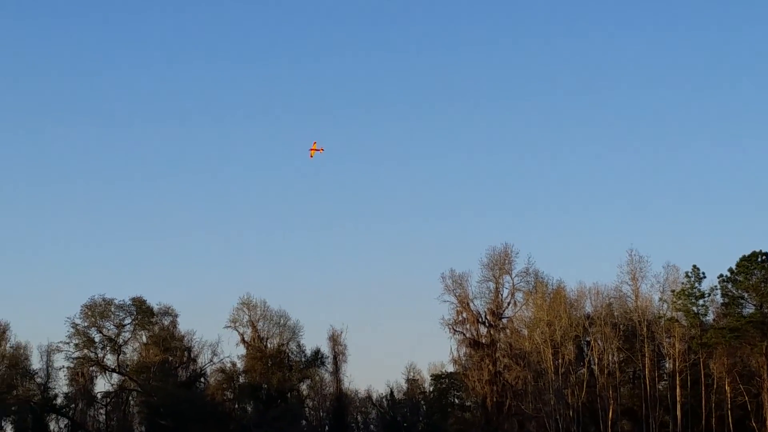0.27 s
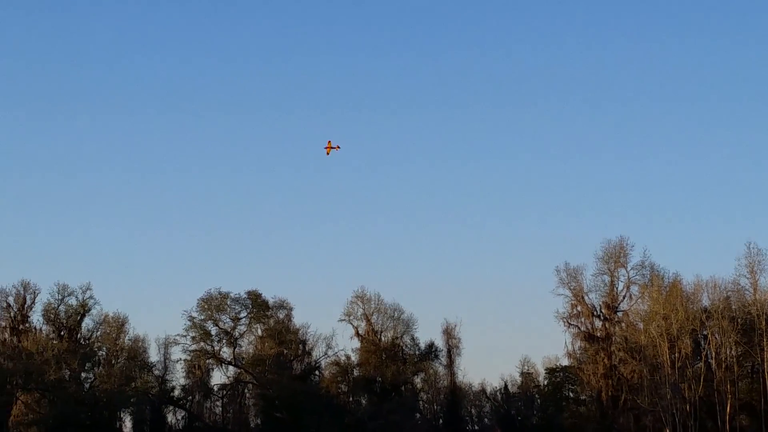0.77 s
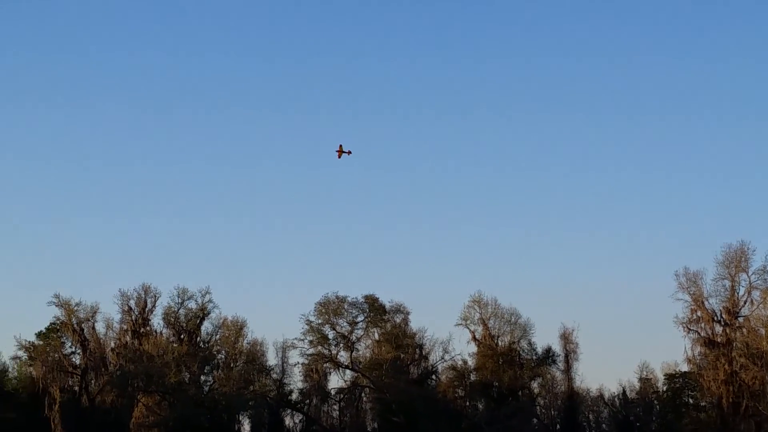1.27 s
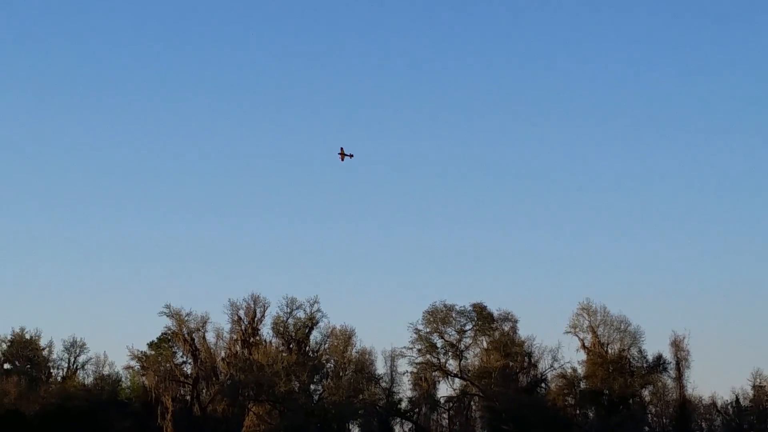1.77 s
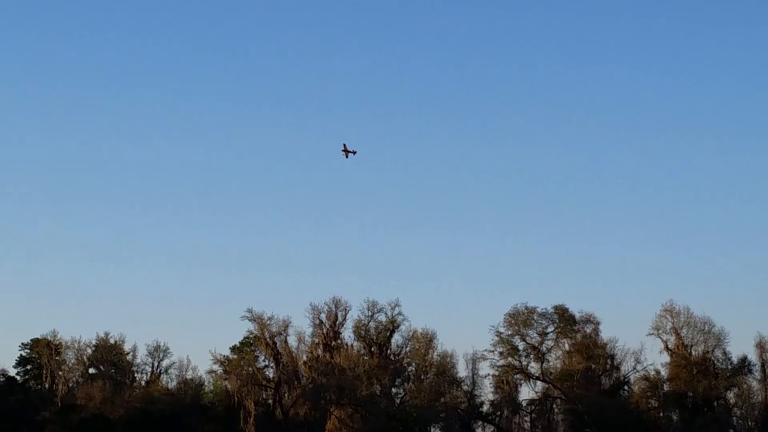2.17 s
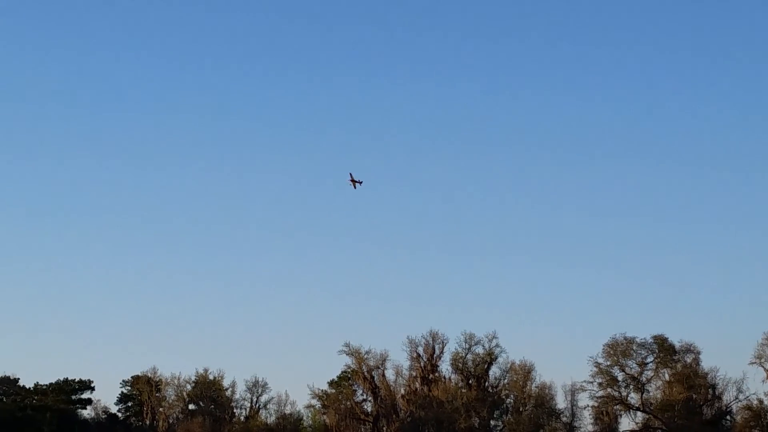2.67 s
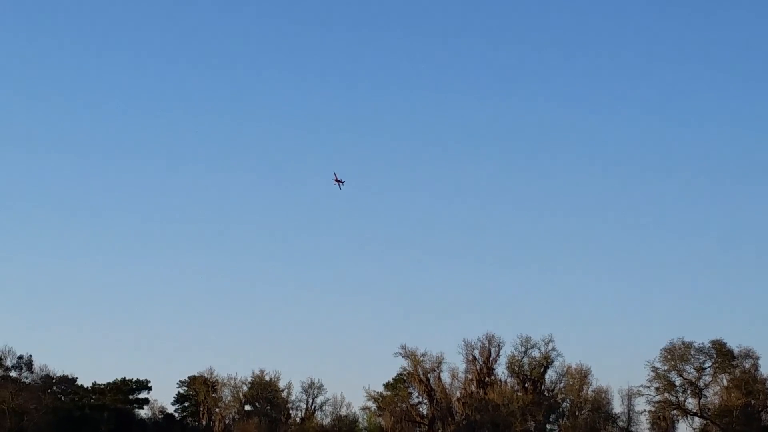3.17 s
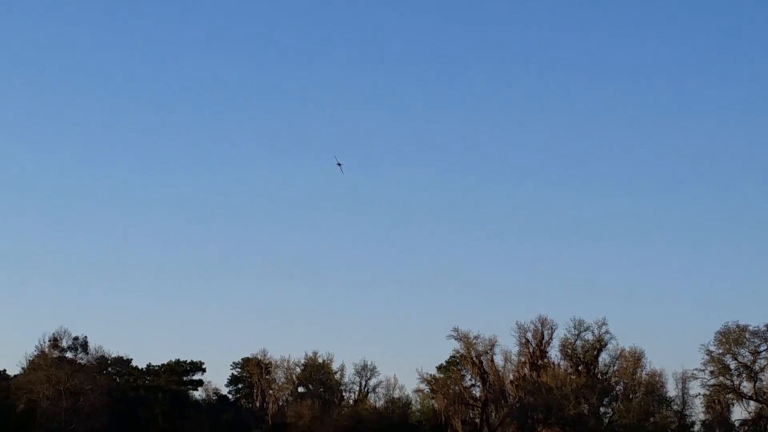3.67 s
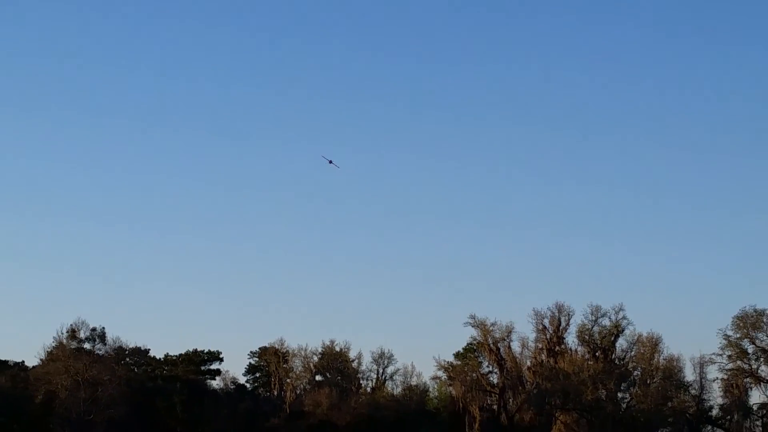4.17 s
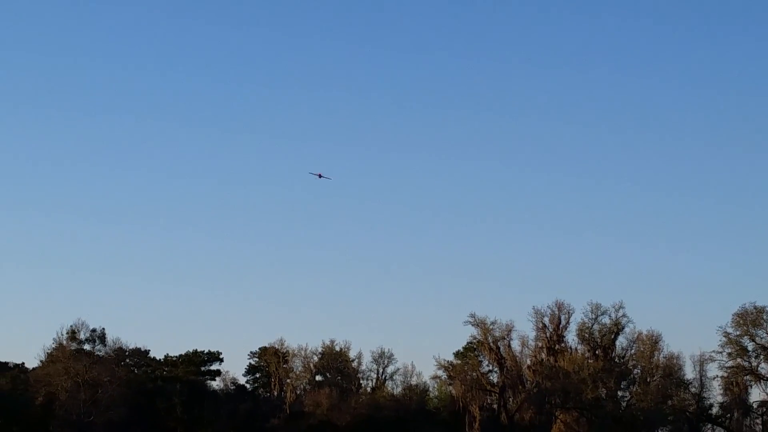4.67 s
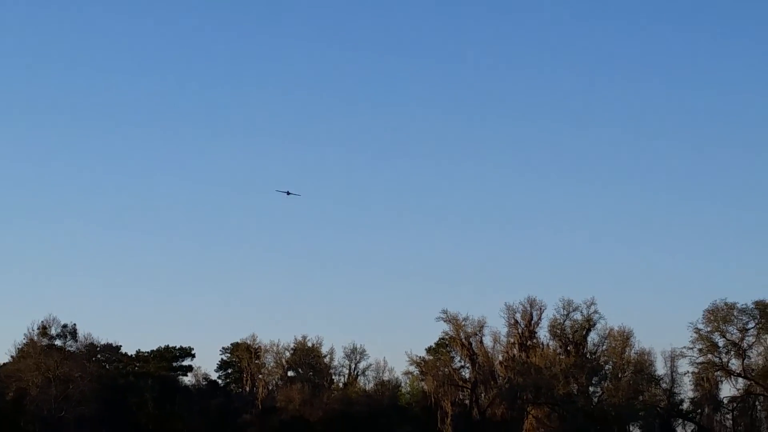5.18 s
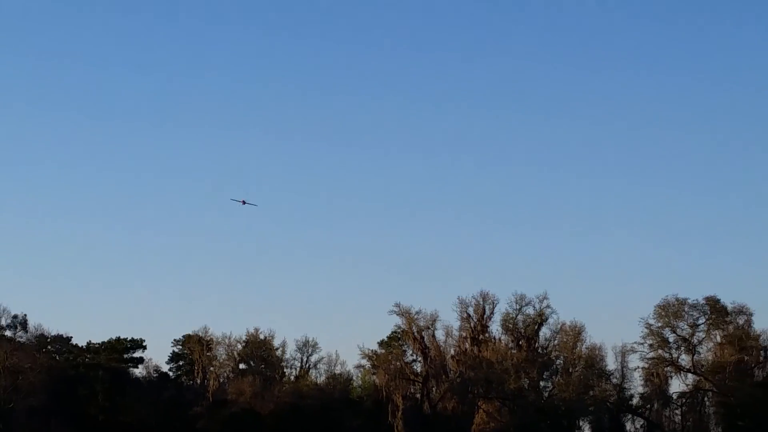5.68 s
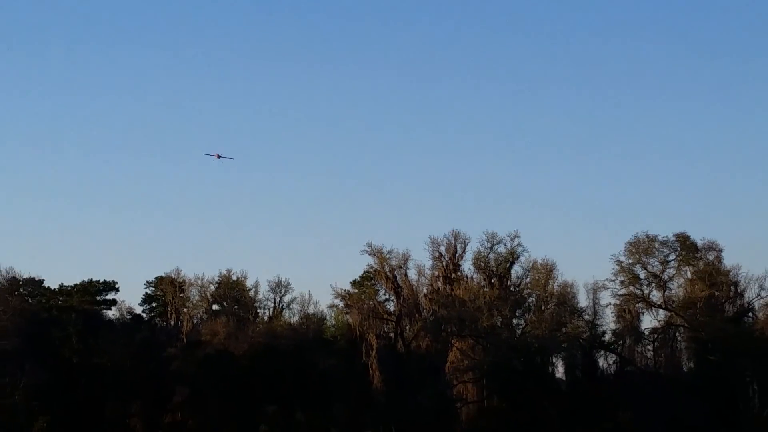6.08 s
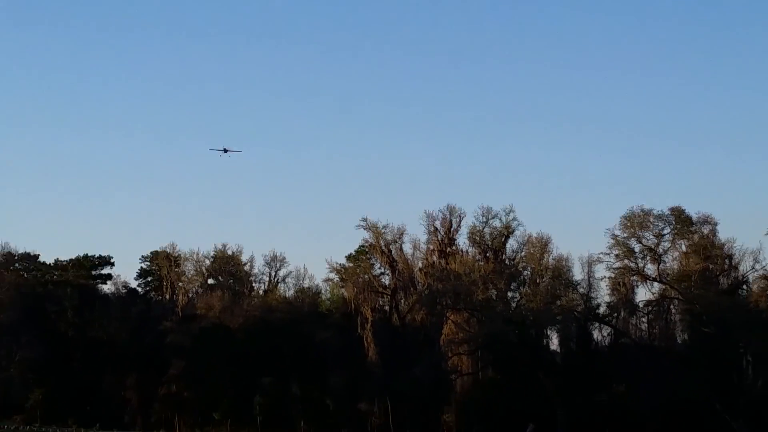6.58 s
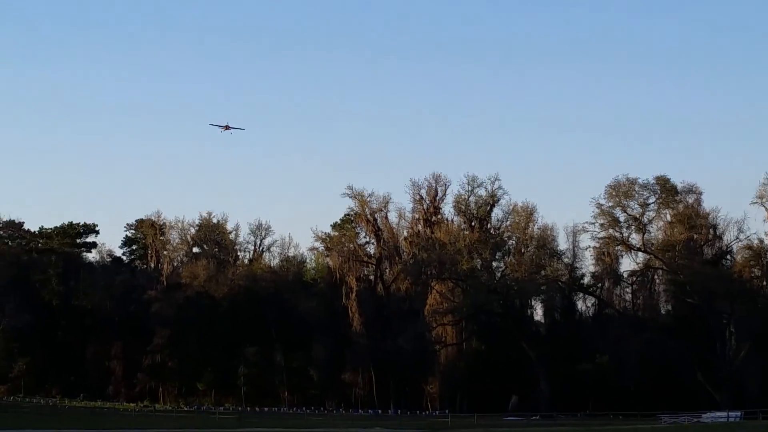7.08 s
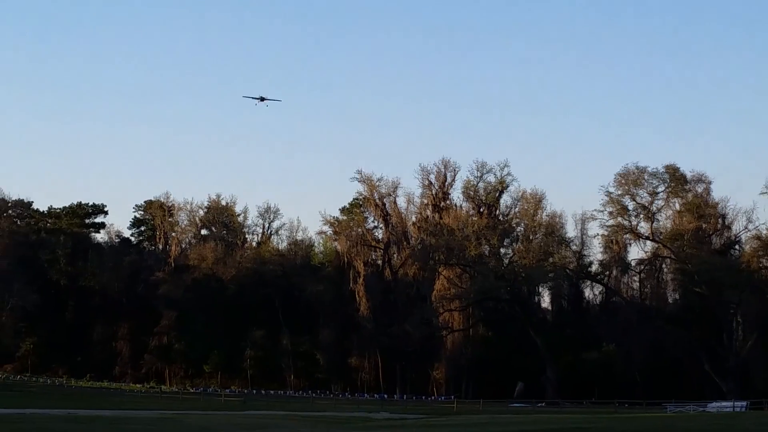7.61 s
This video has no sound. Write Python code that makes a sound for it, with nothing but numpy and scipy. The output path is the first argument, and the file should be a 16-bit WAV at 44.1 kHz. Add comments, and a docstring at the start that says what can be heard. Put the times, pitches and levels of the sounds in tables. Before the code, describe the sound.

A large petrol model airplane drones steadily over a field, throttles back to a rough idle, then glides in whooshing while wind and hand knocks hit the microphone.

```python
"""A large petrol model airplane flies over a field ringed by trees, then throttles back and glides in.
Its single cylinder fires once a turn, every second pulse weak under power and all uneven at idle; the pulses
excite the muffler and a bright rasp. The propeller adds shaft and blade tones, the airframe chopped flow noise.
Ground and tree line echo engine and airframe. Wind rumbles and thumps over a far rustle, a faint wide treble hiss
rises and falls, and a hand on the camera makes buffeting and friction noise and knocks that ring its case."""
import sys
import numpy as np
from scipy import signal
from scipy.fft import rfft, irfft
from scipy.io import wavfile
from scipy.ndimage import uniform_filter1d, map_coordinates

SR = 44100
rng = np.random.default_rng(int(sys.argv[2]) if len(sys.argv) > 2 else 0)


def master(y):
    """Save y as 16-bit WAV."""
    cut = np.clip(np.atleast_2d(y).T, -1, 1)
    pcm = np.round(cut * 32767)  # scale
    wavfile.write(sys.argv[1], SR, pcm.astype(np.int16))


N = 346164
TIME = np.arange(N) / SR  # s

# mean engine speed as heard, before hunting: columns [t/s, shaft turns f/Hz]
SHAFT_SPEED = [(0, 85), (.14, 84.1), (.52, 87), (.64, 87.44), (.84, 85.26), (1.12, 84.7), (1.32, 86.2),
               (1.68, 86.6), (1.75, 85.4), (1.81, 81.14), (1.91, 80.67), (2.06, 76.53), (2.23, 75.23),
               (2.47, 56.65), (2.9, 61.85), (3.7, 62.1), (4.05, 65), (4.5, 63.8), (4.85, 57.47),
               (6.9, 54.25), (7.4, 61.5), (7.85, 63.03)]
# engine level as the outlet swings toward and away from the listener, before mixing gains:
# columns [t/s, exhaust level/dB, rasp level/dB]
ENGINE_LEVELS = [(0, -39, -43), (.25, -45.5, -50.5), (.62, -49, -59.5), (.85, -46, -51),
                 (1.12, -44.5, -54.5), (1.42, -44, -50), (1.68, -41.5, -41.5), (2.24, -49.5, -61.5),
                 (2.54, -78, -73), (2.85, -54, -64), (3.1, -47, -54.5), (3.3, -48.5, -56.5),
                 (3.48, -45.5, -51), (3.7, -48, -52.5), (3.95, -51, -61), (4.5, -59, -67.5),
                 (4.95, -63, -59), (5.55, -53, -59), (6.35, -48.5, -53), (7.1, -57.5, -87),
                 (7.85, -47.5, -60)]
# air rush during the glide: time of the maximum, rise and fall to -10 dB (s); level before mixing (dB)
RUSH_AT_S, RUSH_RISE_S, RUSH_FALL_S, RUSH_DB = 7.362, 1.27, 0.52, -47.5


def undb(db):
    """Amplitude ratio of a level: 20 dB per factor of ten."""
    return 10 ** (np.asarray(db) / 20)


def curves(rows):
    """Piecewise linear interpolation in time of each column of a table."""
    s, *columns = np.transpose(rows)
    return [np.interp(TIME, s, c) for c in columns]


def unit(x):
    """Normalization to a root-mean-square value of 1."""
    return x / np.sqrt(np.mean(x ** 2))


def pan(db):
    """Interchannel level difference, left minus right, as two gains."""
    return undb(np.array([[db], [-db]]) / 2)


def colour(x, points):
    """Minimum-phase filtering: the folded cepstrum of a (Hz, dB) curve gives a causal response; rms 1."""
    size = 8192
    hz, db = np.transpose(points)
    bins = np.maximum(np.fft.rfftfreq(size, 1 / SR), 1)
    log_gain = np.log(undb(np.interp(np.log(bins), np.log(hz), db)))
    cepstrum = irfft(log_gain, size)
    cepstrum[1:size // 2] *= 2
    cepstrum[size // 2 + 1:] = 0
    response = irfft(np.exp(rfft(cepstrum)))
    return unit(signal.oaconvolve(np.atleast_2d(x), response[None], axes=1)[:, :N])


def noise(likeness):
    """Partly coherent white noise at two microphone ports; likeness is the shared power fraction."""
    shared = np.clip(likeness, 0, 1)
    common = np.sqrt(shared) * rng.standard_normal(N)
    return common + np.sqrt(1 - shared) * rng.standard_normal((2, N))


def walk(rate):
    """Band-limited random modulation: smoothly joined random points, rate per second, spread near 1."""
    points = rng.standard_normal(1024)
    coarse = map_coordinates(points, [TIME[::20] * rate], order=2, mode="wrap")
    return coarse.repeat(20)[:N]


def swell(at_s, rise_s, fall_s):
    """Gaussian envelope of height 1, 10 dB down at rise_s before and fall_s after its top."""
    return undb(-10 * ((TIME - at_s) / np.where(TIME < at_s, rise_s, fall_s)) ** 2)


def touch(start_s, length_s, attack_s, release_s):
    """Contact envelope: linear rise up to the start, a hold, then exponential relaxation."""
    rise = np.clip(1 + (TIME - start_s) / attack_s, 0, 1)
    return rise * np.exp(-np.maximum(TIME - start_s - length_s, 0) / release_s)


def ring(modes, contact_s):
    """Modal decay after an impact: a longer contact low-passes the sum of damped modes; peak 1."""
    age = TIME[:SR // 10]
    x = sum(undb(db - 60 * age / t60) * np.sin(2 * np.pi * hz * age) for hz, t60, db in modes)
    push = np.hanning(int(contact_s * SR) + 3)
    x = np.convolve(x, push)[:len(age)]
    return x / np.abs(x).max()


def resonate(x, hz, width_hz):
    """Heterodyne band-pass: shift the moving centre to zero, low-pass, shift back."""
    carrier = np.exp(2j * np.pi * np.cumsum(hz) / SR)
    narrow = signal.butter(2, width_hz / 2, fs=SR, output="sos")
    return np.real(signal.sosfilt(narrow, x / carrier) * carrier)


def load():
    """Engine power from 0 to 1, taken as a clipped linear function of mean shaft speed."""
    unloaded_hz, loaded_hz = 64.3, 81.69
    shaft_hz, = curves(SHAFT_SPEED)
    return np.clip((shaft_hz - unloaded_hz) / (loaded_hz - unloaded_hz), 0, 1)


def approach():
    """Relative amplitude of the flow noise as the airplane glides in, a Gaussian from 0 to 1."""
    return swell(RUSH_AT_S, RUSH_RISE_S, RUSH_FALL_S)


def air():
    """Turbulent pressure at the ports: gust and steady-wind powers add, over a far rustle."""
    # steady wind on the microphone before its flutter: columns [t/s, level/dB]
    steady_wind = [(0, -54.5), (2.7, -53.5), (3.5, -51.5), (4.7, -57.5), (5.9, -50), (6.3, -44),
                   (7.85, -48.5)]
    # added gusts: columns [time of maximum t/s, level/dB]
    gust_peaks = [(6.17, -53), (6.699, -47), (6.881, -45), (7.3, -41.5), (7.628, -46)]
    # wind rumble spectrum: columns [f/Hz, relative level/dB]
    rumble_spectrum = [(15, -31), (28, -8.5), (45, -4), (100, -4.5), (150, -9.5), (250, -19.5),
                       (500, -28.5), (1500, -37.5), (6000, -74.5)]
    # breeze in the distant trees: columns [f/Hz, relative level/dB]
    field_spectrum = [(30, 4.5), (110, 8), (190, 3.5), (330, 1.5), (600, -0.5), (1100, -12.5),
                      (2000, -26.5), (3200, -40), (7000, -61.5)]
    steady_db, = curves(steady_wind)
    gusts = sum((undb(db) * swell(s, rise_s=0.1, fall_s=0.24)) ** 2 for s, db in gust_peaks)
    wind_db = 10 * np.log10(undb(steady_db) ** 2 + gusts)
    # strong gusts strike each port on its own, the left one harder
    gust = np.clip((wind_db + 47.5) / 10, 0, 1)
    side_gain = undb(np.outer([1, -1], 4.4 * gust - .7))
    rumble = colour(noise(.62 - 0.45 * gust), rumble_spectrum)
    wind = rumble * undb(wind_db + 2.1 * walk(26)) * side_gain
    field = colour(noise(0.9), field_spectrum) * undb(-52.5 + 0.5 * walk(5.5)) * pan(-3.5)
    return wind + field


def hiss():
    """Power addition of three envelopes on a faint, wide treble hiss whose level rises and falls."""
    # hiss spectrum: columns [f/Hz, relative level/dB]
    fizz_spectrum = [(300, 1.5), (2000, 19), (3200, 4.5), (4250, 16), (5400, 3), (6300, -4.5), (7500, -24),
                     (9300, -12.5), (10700, 3.5), (12500, 5), (15000, 1.5)]
    exhaust_db, _ = curves(ENGINE_LEVELS)
    # set from the exhaust level: 0.15 dB per dB above -54 dB, and 1.5 dB more at full power
    base = undb(-69.5 + 0.15 * (exhaust_db + 54) + 1.5 * load())
    late_rise = undb(RUSH_DB - 18.5) * approach()
    # a finger slides over the case
    slide = undb(-54) * touch(start_s=7.38, length_s=0.081, attack_s=0.056, release_s=0.11)
    amplitude = np.sqrt(base ** 2 + late_rise ** 2 + slide ** 2)
    return colour(noise(0), fizz_spectrum) * amplitude * pan(1.3)


def brush():
    """Stick-slip friction: a hand buffets the left port and scuffs the case in uneven slips."""
    # hand strokes, right port 15 dB weaker:
    # columns [start t/s, length t/s, release t/s, buffeting level/dB, skin friction level/dB]
    strokes = [(3.15, .022, 0.01, -51, -86), (5.94, 0.022, .013, -41.5, -48.5),
               (6.028, 0.029, .0053, -27, -40.5), (6.067, 0.028, 0.0059, -21.5, -37),
               (6.111, 0.061, 0.037, -39.5, -42.5), (6.194, .086, 0.11, -48, -47.5)]
    # buffeting spectrum: columns [f/Hz, relative level/dB]
    buffet_spectrum = [(25, -18.5), (80, -6), (150, 4.5), (220, -3.5), (440, -4.5), (750, -9.5),
                       (1200, -18), (2400, -24.5), (5000, -67), (8000, -98)]
    # skin friction spectrum: columns [f/Hz, relative level/dB]
    skin_spectrum = [(100, 16.5), (700, -3), (1900, 13), (3000, 5.5), (4000, 5.5), (5200, -11.5),
                     (6300, -31.5), (9300, -5.5), (11000, -9), (15000, -14.5)]
    slip_db, slips_per_s = 2.2, 140  # spread of level (dB), random points per second
    push, rub = 0, 0
    for s, length_s, release_s, buffet_db, skin_db in strokes:
        contact = touch(s, length_s, 0.014, release_s)
        push = np.maximum(push, undb(buffet_db) * contact)
        rub = np.maximum(rub, undb(skin_db) * contact)
    buffet = colour(noise(0.68), buffet_spectrum) * push
    slips = undb(slip_db * walk(slips_per_s))
    skin = colour(noise(0.39) * slips, skin_spectrum) * rub
    return (buffet + skin) * undb([[0], [-15]])


def knocks(port_lag_ms=.25):
    """Impulse excitation of damped modes: body knocks and low wind thumps, later at the right port."""
    # knocks on the camera body and low wind thumps on the microphone, levels before panning: columns
    # [t/s, case level/dB, low thud level/dB, sharp tick level/dB, bright snap level/dB, left minus right level/dB]
    blows = [(3.848, -62, -42, -92, -100, 17), (4.02, -36, -57, -88, -100, 28),
             (6.0819, -16, -56, -58, -64, 14), (6.223, -27, -34.5, -18, -21.5, 11.5),
             (6.301, -52, -46, -32, -41, -4), (6.534, -24.5, -48, -35, -40, 21.5),
             (6.5536, -9.5, -38, -10, -29, 7.5), (6.620, -24, -37, -33, -39, 5.5),
             (6.687, -23.5, -55, -25, -67, 7), (7.283, -55, -35.5, -96, -100, 26),
             (7.369, -27.5, -43, -50, -100, 11), (7.621, -49, -30, -93, -100, 18),
             (7.653, -45, -28.5, -95, -100, 9), (7.768, -34.5, -34.5, -61, -100, 8)]
    # camera body modes: columns [f/Hz, t60/s, relative level/dB]
    case_modes = [(542, 0.026, 15), (980, 0.0052, 28), (1400, .0074, -19)]
    # low thud modes: columns [f/Hz, t60/s, relative level/dB]
    thud_modes = [(112, 0.044, 29), (60, 0.043, -8)]
    # sharp contact modes: columns [f/Hz, t60/s, relative level/dB]
    tick_modes = [(1830, .0056, 27), (2660, 0.0038, 12), (3810, 0.0048, 12.5), (4340, 0.0064, -3)]
    # bright snap modes of a hard contact: columns [f/Hz, t60/s, relative level/dB]
    snap_modes = [(10300, 0.00034, 4), (13600, 0.00029, 2)]
    out = np.zeros((2, N + SR))
    hard, soft = ring(case_modes, contact_s=0.00047), ring(case_modes, contact_s=0.0018)
    thud = ring(thud_modes, contact_s=0.0022)
    tick, snap = ring(tick_modes, contact_s=0), ring(snap_modes, contact_s=0)
    for s, case_db, thud_db, tick_db, snap_db, pan_db in blows:
        case = hard if tick_db > -70 else soft  # without a tick the ring is duller
        blow = undb(case_db) * case + undb(thud_db) * thud
        blow = blow + undb(tick_db) * tick + undb(snap_db) * snap
        start = int(s * SR)
        out[:, start:start + len(blow)] -= blow * pan(pan_db)
    out[1] = np.roll(out[1], int(port_lag_ms * SR / 1000))
    return out[:, :N]


def tree_line(x, t60=0.24, wet_db=-10, first_s=0.014):
    """Diffuse reflection: trunks and crowns scatter a late, decaying echo, different at each port."""
    age = TIME[:SR]
    tail = rng.standard_normal((2, SR)) * undb(-60 * age / t60) * (age > first_s)
    return undb(wet_db) * signal.fftconvolve(x, unit(tail) / np.sqrt(SR), axes=1)[:, :N]


def ground(x, lag_ms, bounce):
    """Comb-filter interference with a weaker ground reflection, whose lag shrinks as the airplane sinks."""
    echo = np.array([np.interp(TIME - lag_ms / 1000, TIME, side) for side in x])
    return (x + bounce * echo) / np.hypot(1, bounce)


def turbulence(x, fades_per_s=7):
    """Multipath fading: moving air opens and closes detours, so that partials fade differently."""
    # detours through the moving air: columns [lag t/ms, share of the sound as amplitude ratio]
    detours = [(3.1, .18), (6.7, .17), (10.3, .14)]
    out = x
    for lag_ms, share in detours:
        late = np.pad(x, ((0, 0), (int(lag_ms * SR / 1000), 0)))[:, :N]
        out = out + share * walk(fades_per_s) * late
    return out / np.sqrt(1 + sum(share ** 2 for _, share in detours))


def airframe(turns, chop=0.17):
    """Aeroacoustic flow noise with wavering bands and a head-on whistle, chopped at blade passage."""
    # wavering bands of the air rush: columns [mean f/Hz, width f/Hz, level over the rush/dB before mixing]
    rush_bands = [(620, 76, -10), (1313, 110, -15.5), (1850, 280, -21.5), (2425, 190, -17.5)]
    # air rush spectrum: columns [f/Hz, relative level/dB]
    rush_spectrum = [(100, -10), (330, -16), (630, 1), (1100, 4.5), (1900, 7.5), (2400, 6), (3050, -2.5),
                     (3500, -18.5), (4600, -11.5), (5500, -14.5), (7500, -76)]
    # thin whistle spectrum: columns [f/Hz, relative level/dB]
    whistle_spectrum = [(2800, -28), (4000, -23), (4900, 15.5), (5450, 13.5), (5850, 17), (6100, 13),
                        (6600, 10.5), (7200, -4), (8500, -48)]
    waver_share, wavers_per_s = 0.052, 8.2  # spread of pitch (fraction), wanders per second
    blade_pass = 1 + chop * np.cos(2 * 2 * np.pi * turns)
    # the whistle is heard while the nose points at the listener
    head_on = swell(at_s=7.235, rise_s=0.26, fall_s=0.42)
    flow = noise(1.0) * blade_pass
    bands = 0
    for hz, width_hz, db in rush_bands:
        moving_hz = hz * (1 + waver_share * walk(wavers_per_s))
        bands = bands + undb(db) * unit(resonate(flow, moving_hz, width_hz))
    broad = undb(-1.0) * colour(noise(0.86) * blade_pass, rush_spectrum)
    # the bands strengthen against the broad rush as it swells
    rush = (broad + bands * approach()) * approach() * undb(RUSH_DB + 0.71 * walk(15))
    whistle = colour(noise(0.039) * blade_pass, whistle_spectrum) * head_on * undb(-67 + 0.85 * walk(5.7))
    return rush * pan(-5.5) + whistle * pan(-20.0)


def propeller(turns, shaft_db, blade_db):
    """Rotor harmonics: shaft tone, blade-passing tone at twice it and its octave, wavering in moving air."""
    angle = 2 * np.pi * turns
    shaft = undb(shaft_db + 1.1 + 1.3 * walk(16)) * np.sin(angle)
    blade_wave = np.sin(2 * angle) + undb(-16.5) * np.sin(2 * 2 * angle)
    blades = undb(blade_db - 1.0 + 0.16 * walk(0.85)) * blade_wave
    return np.sqrt(2) * (shaft + blades) * pan(-0.85)


def pops(pan_db=-4):
    """Impulse excitation of muffler modes: at idle, unburnt fuel now and then pops."""
    # pops: columns [t/s, peak level/dB before panning]
    pop_times = [(2.434, -40), (3.1207, -36), (3.136, -31.5), (4.011, -34), (4.224, -40), (5.582, -40)]
    # muffler modes that a pop rings: columns [f/Hz, t60/s, relative level/dB]
    pop_modes = [(400, 0.005, 11), (850, 0.0066, 7), (1750, .004, -25)]
    out, pop = np.zeros(N + SR), ring(pop_modes, contact_s=0.00043)
    for s, db in pop_times:
        start = int(s * SR)
        out[start:start + len(pop)] -= undb(db) * pop
    return out[:N] * pan(pan_db)


def firings(turns, skip, power):
    """Jittered pulse train, one a turn: alternate pulses weaken; a feeble firing leaves fuel for the next."""
    count = np.arange(int(turns[-1]))
    chance = rng.standard_normal((len(count), 2))
    power_jitter, idle_jitter, carry_over = .003, .009, .6  # turns, turns, fraction
    power_scatter_db, idle_scatter_db = .8, 2.2
    jitter = idle_jitter + (power_jitter - idle_jitter) * np.interp(count, turns, power)
    at = np.interp(count + jitter * chance[:, 0], turns, np.arange(N)).astype(int)
    charge = (chance[:, 1] - carry_over * np.roll(chance[:, 1], 1)) / np.hypot(1, carry_over)
    scatter_db = idle_scatter_db + (power_scatter_db - idle_scatter_db) * power[at]
    pulses = np.zeros(N)
    pulses[at] = (1 - skip[at] * (count % 2 == 0)) * undb(scatter_db * np.minimum(charge, 1))
    return pulses / np.sqrt(uniform_filter1d(pulses ** 2, SR // 2))  # even level over half a second


def scatter(x, spread_s, own=0.3, intact_hz=450):
    """Dispersion over many short paths: each band has its own group delay, and phases differ by port."""
    size = 8192
    hz = np.fft.rfftfreq(size, 1 / SR)
    bands = np.arange(0, SR / 2, 70)
    random_delay = np.interp(hz, bands, rng.random(len(bands)) - .5)
    delay = spread_s * random_delay * np.minimum(hz / intact_hz, 1) ** 2  # the bass stays intact
    phase = 2 * np.pi * np.cumsum(delay) * SR / size
    ports = np.array([np.interp(hz, bands, rng.standard_normal(len(bands))) for _ in range(2)])
    ports = ports * own * np.sqrt(hz / 100)
    lead = size // 8  # room for early arrivals
    response = np.roll(irfft(np.exp(1j * (ports - phase))), lead, axis=1)
    return signal.oaconvolve(x[None], response, axes=1)[:, lead:lead + N]


def moving_band(x, band, width_hz, waver_db=0.5):
    """Time-varying band-pass: one band of the exhaust note, shifting as sound paths change."""
    centre_hz, db = curves(band)
    return unit(resonate(x, centre_hz, width_hz)) * undb(db + waver_db * walk(12))


def bright_bands(crack, power):
    """Spectral peaks of the exhaust rasp, partly from ground reflection, differing between power and idle."""
    # columns [f/Hz under power, f/Hz at idle, width f/Hz, relative level/dB under power, level/dB at idle]
    rasp_bands = [(855, 844, 110, -8.5, -2), (1430, 1330, 350, -26, -31.5), (1780, 1812, 276, -12, -10.5),
                  (2268, 2300, 140, -19, -25)]
    out = 0
    for hz, idle_hz, width_hz, db, idle_db in rasp_bands:
        centre_hz = idle_hz + (hz - idle_hz) * power
        gain = undb(idle_db + (db - idle_db) * power)
        out = out + gain * unit(resonate(crack, centre_hz, width_hz))
    return out


def engine(turns, power, exhaust_db, rasp_db, puff_s=0.0071, steady_gas=0.36, gas_db=-2):
    """Source-filter exhaust: pulses ring the muffler and crack at the outlet; puffs of gas noise rasp."""
    # muffler under power: columns [f/Hz, relative level/dB]
    muffler_spectrum = [(30, -28.5), (60, -19.5), (125, 7.5), (215, -10.5), (265, 7), (345, 7), (440, 1.5),
                        (520, 1), (660, 2.5), (800, 3.5), (900, -4.5), (1050, -2), (1800, -22.5),
                        (3000, -42.5), (7000, -75)]
    # muffler at idle: columns [f/Hz, relative level/dB]
    idle_spectrum = [(40, -17), (125, -3.5), (195, -5.5), (265, 9.5), (400, 3), (500, 2.5), (620, 6.5),
                     (700, 5.5), (850, 3.5), (1100, 2.5), (1400, -15), (1800, -27), (2300, -32.5),
                     (3000, -61.5), (7000, -69)]
    # crack and rasp at the outlet: columns [f/Hz, relative level/dB]
    rasp_spectrum = [(200, -23.5), (600, 0.5), (900, 9), (1250, 9.5), (1800, 2.5), (2300, -7), (3000, -21),
                     (4500, -26.5), (7000, -51.5)]
    # moving low band of the exhaust note, shifting as sound paths change:
    # columns [t/s, centre f/Hz, relative level/dB]
    low_band = [(.2, 378.6, 0), (.4, 437, -1.5), (.6, 432, 4.5), (0.721, 372, -10), (.85, 310, -5.5),
                (1.2, 320, 6.5), (1.45, 346, -2.5), (1.65, 341, -8), (1.9, 296, -8), (2.249, 295, -4.5),
                (3.15, 254, -2), (3.7, 381, -21), (3.95, 397, -1), (4.301, 390, 4), (4.8, 353, -29)]
    # moving middle band of the exhaust note: columns [t/s, centre f/Hz, relative level/dB]
    mid_band = [(0, 507, -6), (.219, 497, 6), (.359, 515, -26), (.679, 538, -19), (.82, 548, 4.5),
                (1.082, 546, -8), (1.251, 595, -11.5), (1.65, 613, -5), (1.86, 592, 7), (2.1, 570, -5),
                (2.5, 555, -19), (3.5, 570, -13.5), (4.299, 591, -7), (4.8, 596, -9), (5.6, 654, -8.5)]
    # moving high band of the exhaust note: columns [t/s, centre f/Hz, relative level/dB]
    high_band = [(0, 851, -3), (.25, 818, -7.5), (.55, 862, -1), (.8, 850, -16), (1.05, 793, -11.5),
                 (1.301, 840, -7), (1.55, 801, -1), (1.749, 832, -21), (2.0, 788, -27), (2.449, 840, -27),
                 (2.85, 835, 0), (3.1, 855, -5), (3.5, 855, -10), (3.901, 850, -7.5), (4.5, 802, 2),
                 (4.9, 856, -12)]
    idle_skip, power_skip = 0.11, 0.79  # share by which every second firing is weakened
    skip = np.clip(idle_skip + (power_skip - idle_skip) * power, 0, 1)
    pulses = firings(turns, skip, power)
    loaded = np.sqrt(power) * scatter(pulses, .022)
    idling = np.sqrt(1 - power) * scatter(pulses, .005)
    muffler = np.sqrt(power.mean()) * colour(loaded, muffler_spectrum)
    muffler = muffler + np.sqrt(1 - power.mean()) * colour(idling, idle_spectrum)
    bands = moving_band(muffler, low_band, width_hz=75)
    bands = bands + moving_band(muffler, mid_band, width_hz=110)
    bands = bands + moving_band(muffler, high_band, width_hz=63)
    bark = (undb(-2) * muffler + undb(-10.5) * bands) * undb(exhaust_db + .5 * walk(4.5))
    # each pulse releases an exponentially dying puff of gas
    puffs = unit(signal.lfilter([1], [1, -np.exp(-1 / (puff_s * SR))], pulses))
    gas = undb(gas_db) * unit(noise(0.35) * (puffs + steady_gas))
    crack = colour(gas + .8 * unit(loaded + idling), rasp_spectrum)
    flutter_db = .6 * walk(14)
    rasp = (undb(2.0) * crack + bright_bands(crack, power)) * undb(rasp_db - 6.0 + flutter_db)
    return turbulence(bark) * pan(-3.0) + rasp * pan(-7.5)


def airplane():
    """Superposition of phase-locked sources: echoed engine and airframe, direct propeller; idle speed hunts."""
    # propeller tones before trim and waver: columns [t/s, once-a-turn level/dB, blade level/dB]
    tone_levels = [(0, -47.5, -53), (.35, -49.5, -50), (.58, -49, -46), (.72, -51.5, -57.5),
                   (.85, -43.5, -49), (1.1, -49, -51), (1.67, -50, -58.5), (1.8, -46, -44.5),
                   (2.2, -48.5, -46), (2.4, -52, -54), (2.65, -59.5, -56.5), (3.4, -53, -51.5),
                   (3.85, -60, -55.5), (4.05, -59.5, -55), (4.6, -61, -57.5), (5, -59, -61.5),
                   (5.5, -62.5, -55), (6.5, -81, -51.5), (7.85, -58, -56.5)]
    # ground echo: columns [t/s, lag t/ms, share reflected as amplitude ratio]
    ground_path = [(0, 2.45, 0.52), (1.6, 2.37, 0.24), (3.3, 2.24, 0.54), (4.4, 2.2, .48), (5, 1.94, .45),
                   (5.6, 1.9, 0.47), (6.4, 1.757, 0.49), (7, 1.67, .42), (7.85, 1.63, .46)]
    hunt_share, hunt_per_s = .007, 9  # spread of unloaded speed (fraction), wanders per second
    shaft_hz, = curves(SHAFT_SPEED)
    power = load()
    hunting = 1 + hunt_share * (1 - power) * walk(hunt_per_s)
    turns = np.cumsum(shaft_hz * hunting) / SR
    source = engine(turns, power, *curves(ENGINE_LEVELS)) + airframe(turns)
    direct = ground(source, *curves(ground_path))
    return direct + tree_line(direct) + propeller(turns, *curves(tone_levels))


def scene():
    """Linear superposition of the open air, hiss, handling and thumps, and the airplane."""
    return air() + hiss() + brush() + knocks() + pops() + airplane()


def record(dry):
    """Linear filtering: the microphone has a deep hollow around 8 kHz, and the camera cuts the top."""
    hollow = signal.butter(2, [6100, 10700], "bandstop", fs=SR, output="sos")
    top = signal.ellip(10, .2, 60, 14750, fs=SR, output="sos")  # low-pass edge in Hz
    return signal.sosfilt(np.vstack([hollow, top]), dry)


dry = scene()
out = record(dry)
master(out)
```